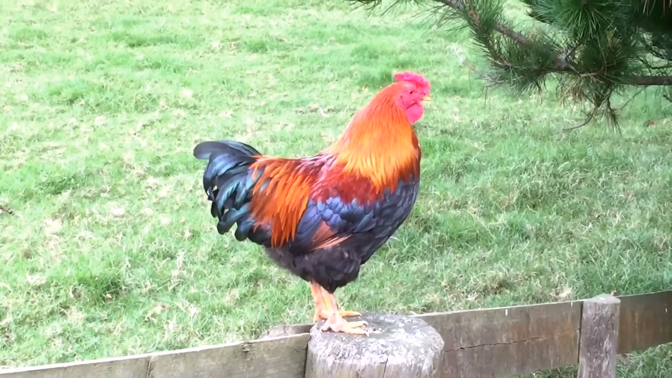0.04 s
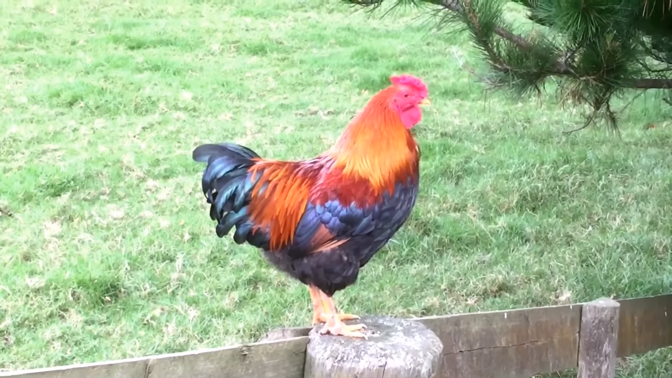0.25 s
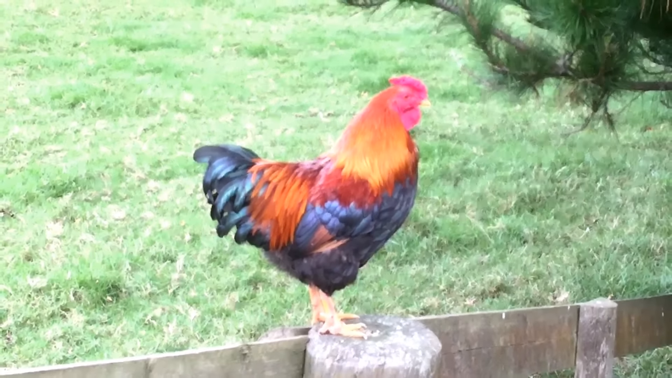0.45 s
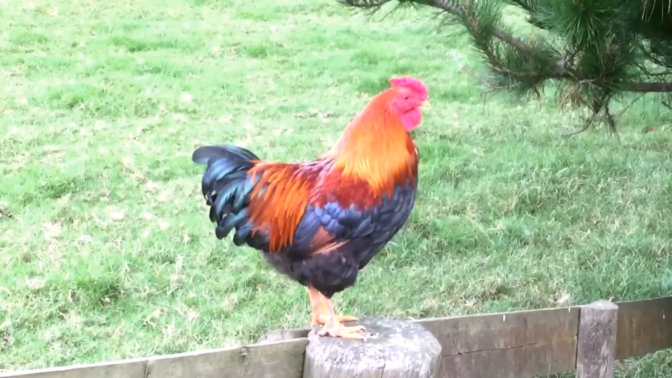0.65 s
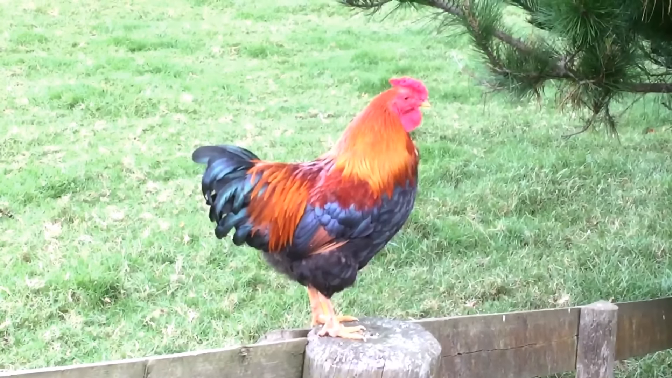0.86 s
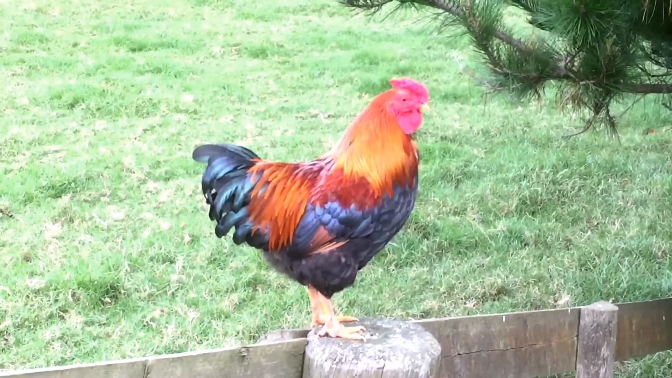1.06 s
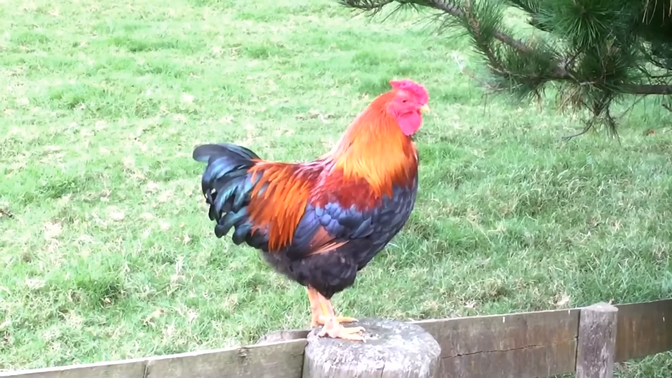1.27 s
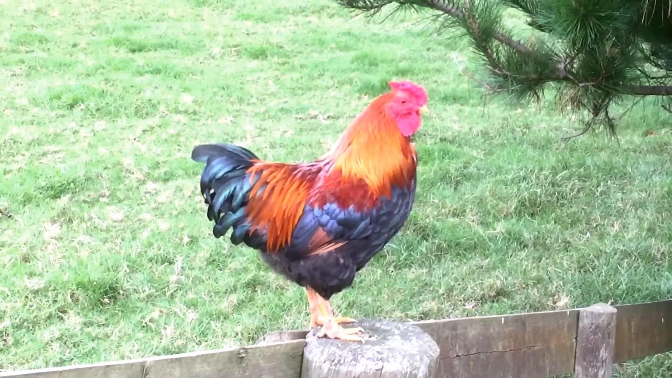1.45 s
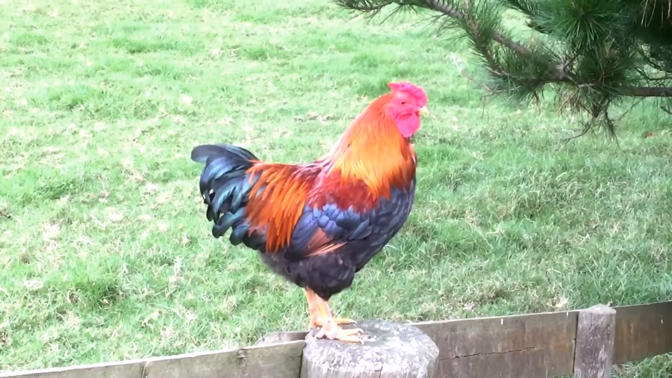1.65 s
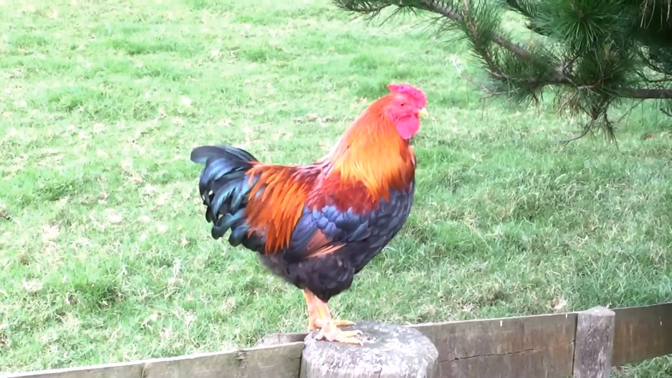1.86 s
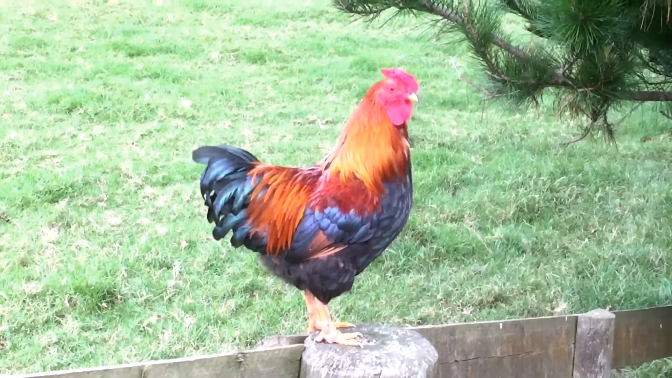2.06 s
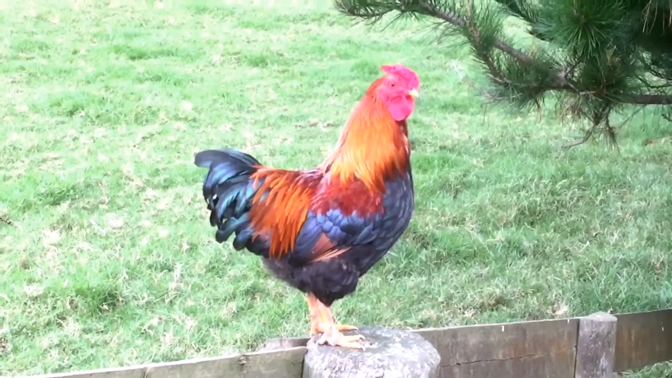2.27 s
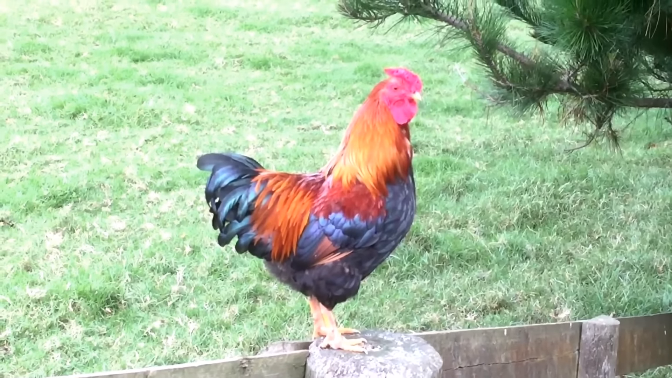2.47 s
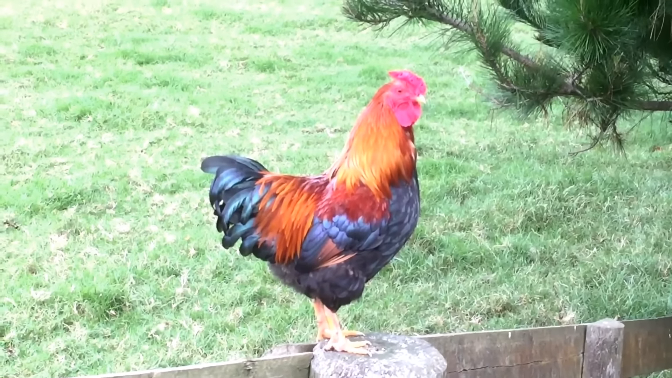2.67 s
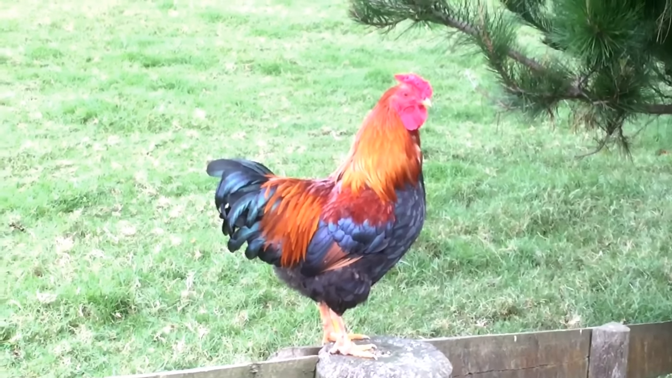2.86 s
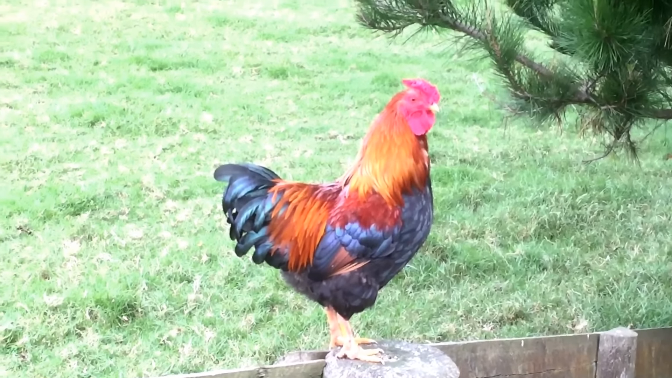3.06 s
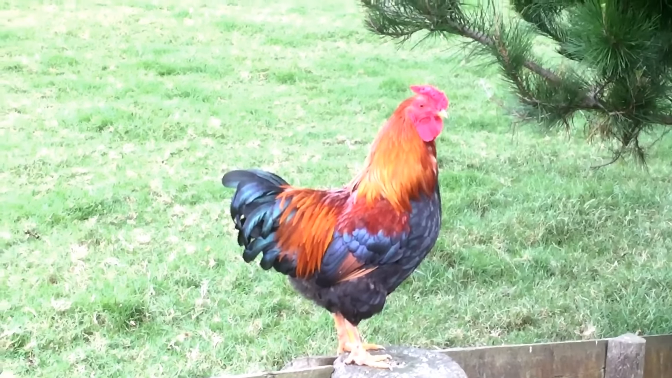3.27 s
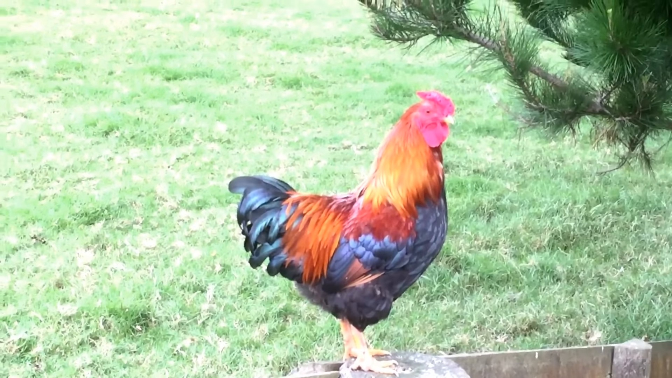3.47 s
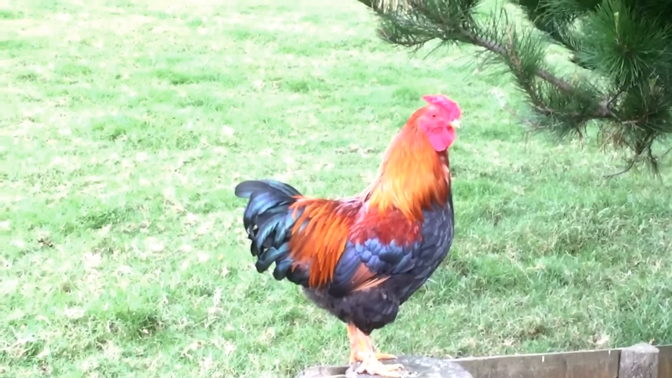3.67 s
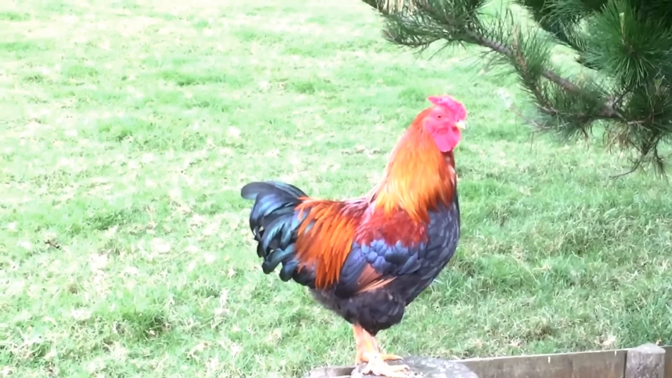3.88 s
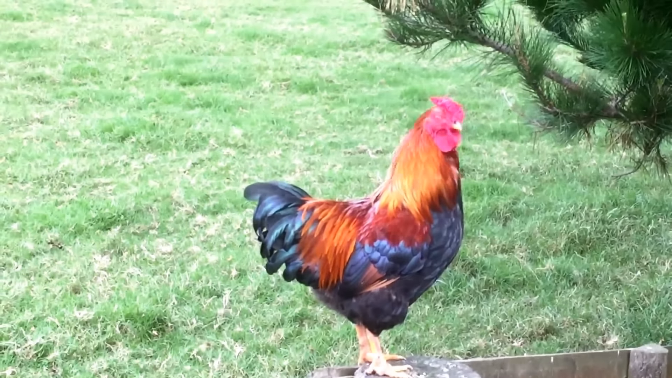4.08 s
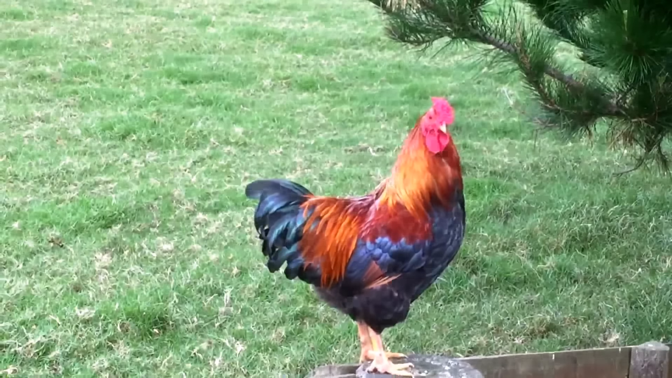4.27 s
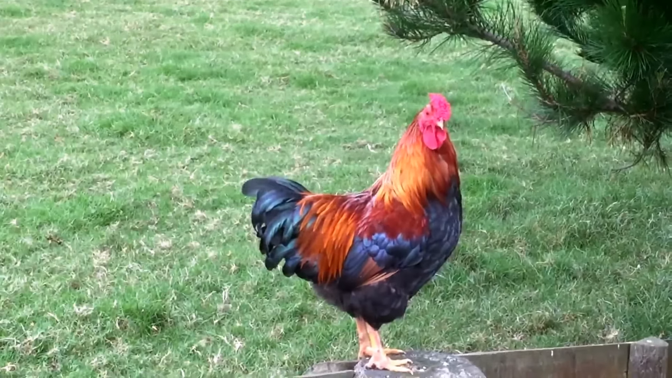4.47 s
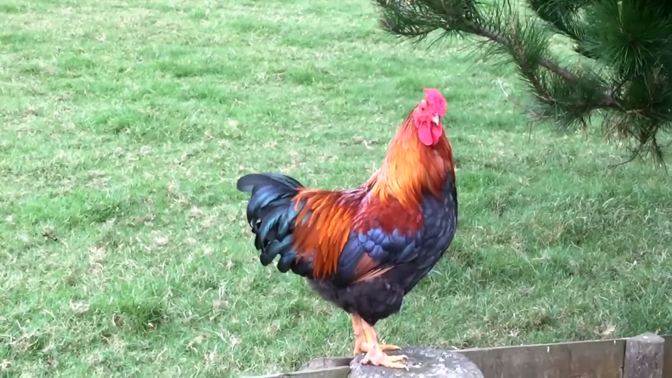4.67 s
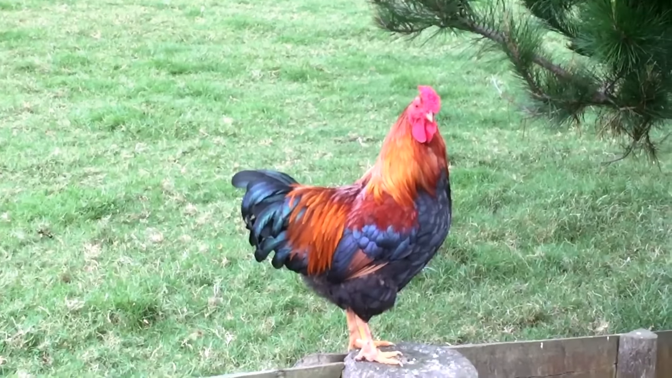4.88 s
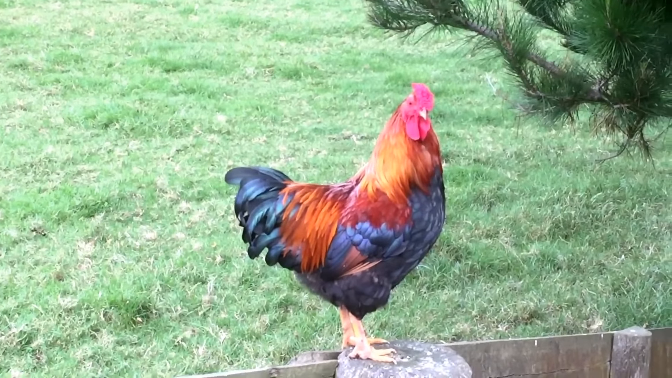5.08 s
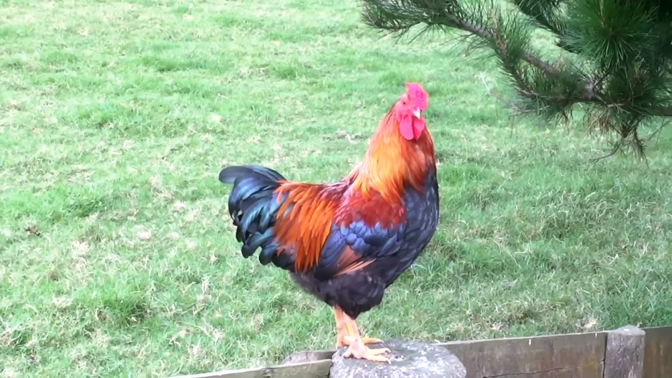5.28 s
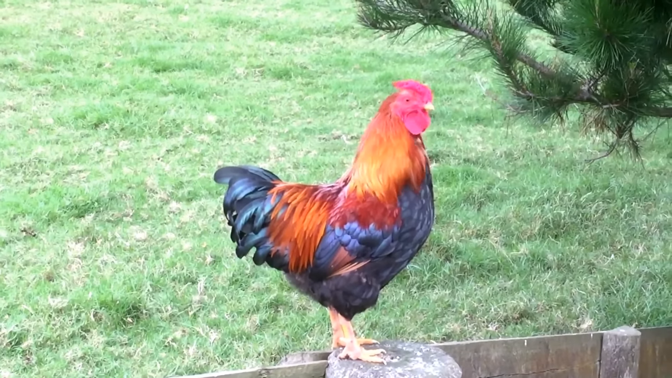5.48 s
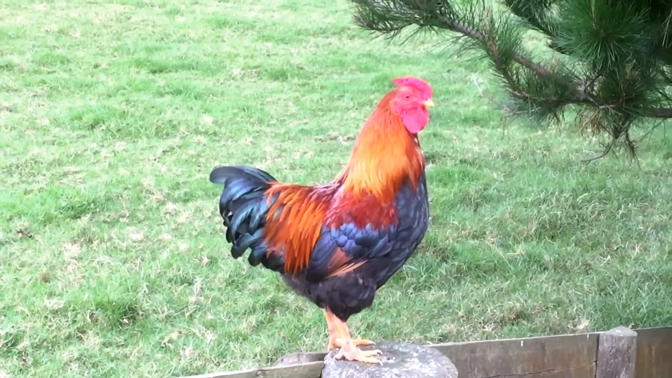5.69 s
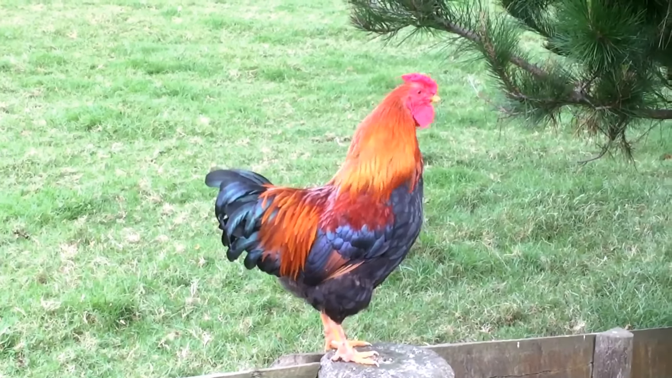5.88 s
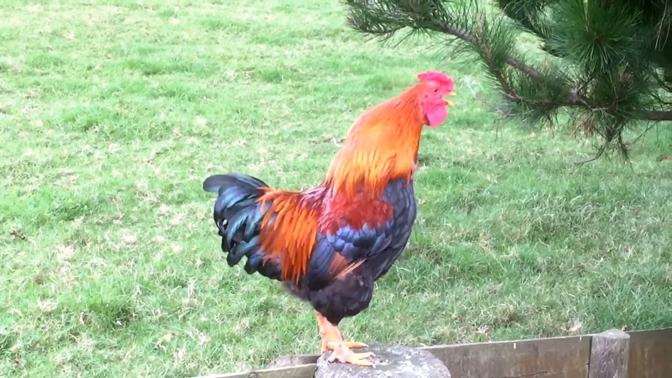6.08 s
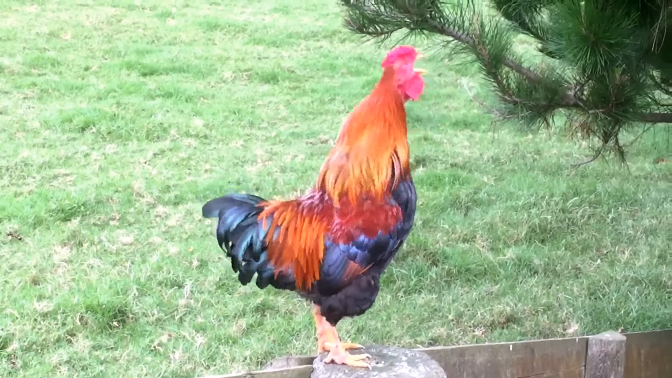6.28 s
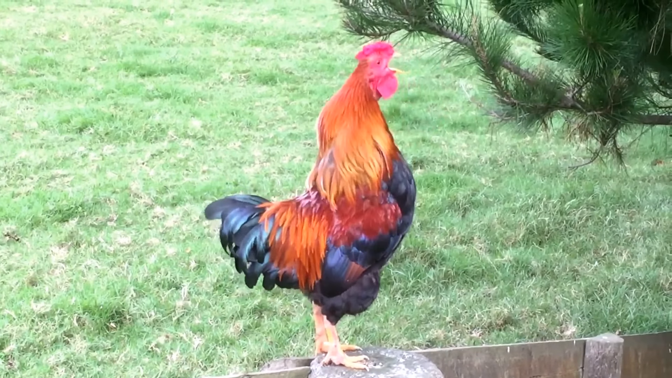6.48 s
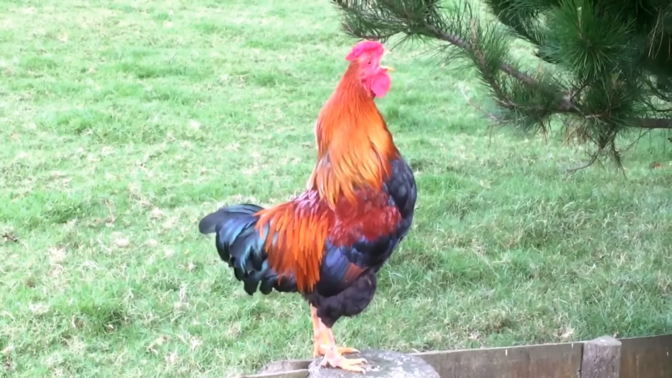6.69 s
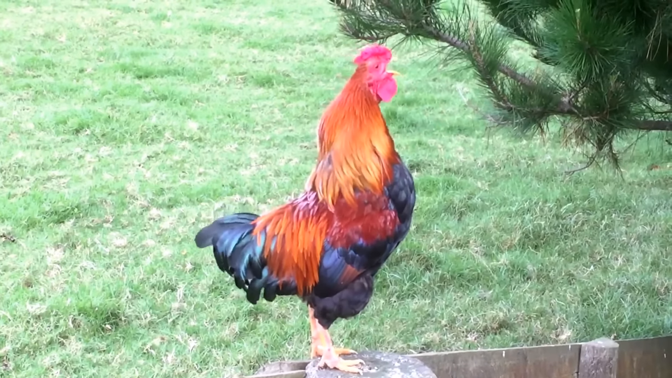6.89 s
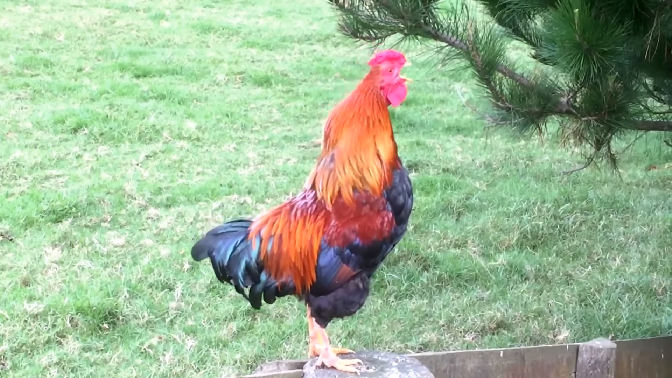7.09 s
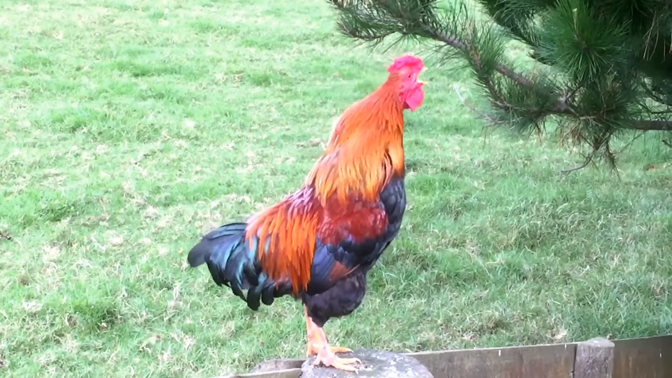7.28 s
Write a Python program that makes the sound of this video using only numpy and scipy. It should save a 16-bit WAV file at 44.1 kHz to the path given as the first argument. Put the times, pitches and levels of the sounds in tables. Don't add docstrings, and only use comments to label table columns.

```python
import sys
import numpy as np
from scipy import signal
from scipy.fft import rfft, irfft
from scipy.io import wavfile
from scipy.ndimage import uniform_filter1d

SR = 44100
rng = np.random.default_rng(int(sys.argv[2]) if len(sys.argv) > 2 else 0)


def undo_db(level):
    steps = np.asarray(level, float) / 20
    return 10 ** steps


def digitize_waveform(pressure):
    field = np.atleast_2d(pressure).T
    bounded = np.clip(field, -1, 1)
    quanta = np.round(bounded * 32767).astype(np.int16)
    wavfile.write(sys.argv[1], SR, quanta)


N = 323694

# (time [s], pitch [Hz], effort [dB], beak opening as second partial [dB], roughness [0-1])
DOODLE = [(6.875, 897.6, -10.5, -6, 0.095), (6.89, 930.5, -12, -3.5, .02), (6.918, 988.6, -17, 11, 0.039),
          (6.94, 925, -10.5, -1.5, .04), (6.96, 960, -13.5, 0, .03), (7.04, 961, -12.5, -0.5, 0.056),
          (7.09, 929, -13.5, -1.5, 0.027), (7.175, 912, -13, -2, 0.025), (7.195, 846, -14.5, -10, .1)]
DIP = [(7.197, 668, -24.5, -0.5, 0.31), (7.222, 637, -25.5, -4.5, 0.28), (7.262, 703, -20, -2.5, 0.11),
       (7.271, 768, -15.5, -9, .26)]


def rms_one(x):
    return x / np.sqrt(np.mean(x ** 2) + 1e-20)


def in_time(rows):
    s, *columns = np.transpose(rows)
    return [np.interp(np.arange(N) / SR, s, c) for c in columns]


def at_hz(points, hz):
    point_hz, point_db = np.array(points).T
    return np.interp(np.log(hz), np.log(point_hz), point_db)


def drift(rate, size=N):
    pole = np.exp(-16 * np.pi * rate / SR)
    settle = 9000
    noise = rng.standard_normal(size // 8 + settle + 2)
    slow = signal.lfilter([1], [1, -2 * pole, pole * pole], noise)[settle:]
    return np.interp(np.arange(size) / 8, np.arange(len(slow)), rms_one(slow - slow.mean()))


def through(x, spectrum):
    log_gain = at_hz(spectrum, np.arange(4097) * SR / 8192 + 1) * np.log(10) / 20
    cepstrum = irfft(log_gain)
    cepstrum[1:4096] *= 2
    response = irfft(np.exp(rfft(cepstrum[:4097], 8192)))
    return signal.fftconvolve(x, response)[:len(x)]


def band(x, low_hz, high_hz, order=2):
    return signal.sosfilt(signal.butter(order, [low_hz, high_hz], "band", fs=SR, output="sos"), x)


def add(out, s, sound):
    at = round(s * SR)
    out[at:at + len(sound)] += sound[:N - at]


def road(patchy_db):
    # (frequency [Hz], level [dB per Hz])
    road_colour = [(25, -51), (50, -3), (140, -9.5), (224, 0.5), (300, -8), (450, -15.5), (710, -16),
                   (1460, -11), (2250, -19.5), (2650, -28.5), (3700, -36), (4900, -47), (9000, -50),
                   (15000, -61)]
    # (nearest [s], approach [s], retreat [s], level over the hum [dB])
    passes = [
        (2.9, 1.59, 0.3, 7),
        (4.3, 1.25, 0.46, 8.5),
        (4.8, 1.05, 1.8, 6.5),
        (5.5, 1.7, 0.88, 3),
        (6.099, 0.63, 2.5, 1),
        (3.9, 1.4, 0.7, 7),
        (5.7, 0.54, 1.7, 5),
    ]
    # (centre [Hz], width [octaves])
    pass_colours = [(1700, 0.8), (214, 0.45), (470, 0.37), (70.5, 0.66), (1300, 1.35), (3100, 0.35),
                    (2970, 0.23)]
    patchy_top_hz, patchy_top_boost = 3040, 0.97
    t = np.arange(N) / SR
    near = []
    for s, approach, retreat, db in passes:
        spread = np.where(t < s, approach, retreat)
        near.append(np.exp(-.5 * ((t - s) / spread) ** 2) * undo_db(2 * db))
    white, out = rng.standard_normal((2, N)), 0
    edges = 22 * 2 ** np.arange(0, 9.9, 1 / 3)
    for k, (low, high) in enumerate(zip(edges, edges[1:])):
        hz = np.sqrt(low * high)
        shares = [np.exp(-.5 * (np.log2(hz / centre_hz) / octaves) ** 2)
                  for centre_hz, octaves in pass_colours]
        power = 1 + np.dot(shares, near)
        mean_power = np.exp(np.log(power).mean())
        far = np.clip(1 - .5 * np.log2(max(hz / 3200, 1)), 0, 1)
        hedge = patchy_top_boost * np.exp(-.5 * (np.log2(hz / patchy_top_hz) / 1.2) ** 2)
        flicker = undo_db(patchy_db * (far + hedge) * drift(3.2))
        out = out + (power / mean_power) ** (far / 2) * flicker * band(white[k % 2], low, high)
    return undo_db(-41) * rms_one(through(out, road_colour))


def car():
    # (time [s], upper edge [Hz], level [dB])
    rising_edge = [(3.0, 865, -49.5), (4.0, 1110, -50.5), (4.4, 1170, -44.5), (4.8, 1300, -45),
                   (5.1, 1700, -42), (5.4, 1899, -44), (5.9, 2090, -46), (6.2, 2250, -56)]
    edge_hz, db = in_time(rising_edge)
    white, roar = rng.standard_normal((3, N)), 0
    edges = 540 * 2 ** np.arange(0, 2.4, 1 / 6)
    for k, (low, high) in enumerate(zip(edges, edges[1:])):
        tilt = (high / edge_hz) ** .4
        edge_loss = 1 + (np.sqrt(low * high) / edge_hz) ** 24
        roar = roar + band(white[k % 2], low, high, order=3) * tilt / edge_loss * undo_db(1.3 * drift(4))
    spray = (edge_hz / 1900) ** 0.65 * rms_one(band(white[2], 4600, 6500))
    return undo_db(db) * rms_one(roar) + undo_db(db - 27.0) * spray


def engines():
    # (time [s], level [dB])
    idling = [(0, -49.5), (.7, -44), (1.3, -56), (2.0, -54), (2.6, -45), (3.2, -46)]
    # (time [s], firing rate [Hz], load [dB])
    pulling = [(4.4, 60.6, -48.5), (4.98, 66.1, -52), (5.2, 70.6, -48.5), (5.35, 73.3, -55.5),
               (5.6, 74.9, -48.5), (5.9, 74.3, -51.5), (6.1, 76.46, -51.5), (7.3, 77, -56)]
    idle_hz, beat_period_s, beat_start_s, beat_share = 59.4, .62, 0.092, 1
    db, = in_time(idling)
    t = np.arange(N) / SR
    beat = (1 + beat_share * np.cos(2 * np.pi * (t - beat_start_s) / beat_period_s)) / 2
    idle_phase = 2 * np.pi * np.cumsum(idle_hz * (1 + 0.013 * drift(2.44))) / SR
    idle = undo_db(db) * beat * np.sin(idle_phase) * np.clip((3.6 - t) / 0.3, 0, 1)
    hz, load_db = in_time(pulling)
    phase = 2 * np.pi * np.cumsum(hz * (1 + 0.02 * drift(5.1))) / SR
    boom_db = -51 + 1.8 * (load_db + 49)
    orders = undo_db(boom_db + 6) * np.sin(phase)
    orders += undo_db(load_db + 6.5) * (np.sin(2 * phase) + 0.59 * np.sin(3 * phase))
    return idle + orders * np.clip((t - 4.2) / 0.49, 0, 1)


def insect(hz=8800):
    # (start [s], end [s], chirp level [dB])
    ticking = [
        (.6, 2.08, -74.5),
        (2.6, 4.05, -76),
        (4.45, 5.797, -76),
    ]
    start_s, period_s = .0995, .11767
    t = np.arange(N) / SR
    beat = ((t - start_s) / period_s + .5) % 1 - .5
    strokes = 1 + 0.51 * np.sin(2 * np.pi * 230 * t)
    chirp = np.exp(-.5 * (beat * period_s / 0.0039) ** 2) * strokes
    tone = band(rng.standard_normal(N), hz - 170, hz + 170)
    bouts = sum(undo_db(db) * np.clip(np.minimum(t - start, end - t) / .15, 0, 1)
                for start, end, db in ticking)
    return bouts * chirp * rms_one(tone)


def small_bird():
    # (start [s], level [dB], number of notes)
    phrases = [
        (.607, -61, 21),
        (3.685, -60, 9),
        (4.04, -63, 4),
        (4.19, -58, 17),
        (5.246, -60, 10),
    ]
    period_s, trill_hz, gain_db, uneven_db = 0.043, 3590, -4.5, 2.5
    out, t = np.zeros(N), np.arange(round(0.019 * SR)) / SR
    for start, db, count in phrases:
        for k, (late, loud, high) in enumerate(rng.standard_normal((count, 3))):
            note_hz = trill_hz * (1 + .012 * high)
            chirp = np.hanning(len(t)) * np.sin(2 * np.pi * note_hz * (1.085 * t - 3.6 * t ** 2))
            at_s = start - .006 + period_s * k + 0.0049 * late
            add(out, at_s, undo_db(db + gain_db + uneven_db * loud) * chirp)
    t = np.arange(SR // 5) / SR
    trees = rng.standard_normal(len(t)) * undo_db(-60 * t / .25)
    return out + undo_db(-36) * signal.fftconvolve(out, trees)[:N]


def rustles():
    # (time [s], level [dB], centre [Hz], width [octaves], length [s])
    bursts = [(0.24, -66, 7000, 1.2, 0.0035), (0.491, -53, 2960, 0.14, 0.051),
              (0.495, -58, 4140, 0.17, 0.037), (0.499, -65, 5600, .12, 0.055), (.602, -74, 5600, .12, .02),
              (3.016, -69, 9800, .5, .03), (3.102, -59, 7000, 0.93, .035), (3.302, -62, 6450, 0.52, 0.011),
              (3.39, -66, 8000, .7, .06), (3.407, -54, 7750, .8, .008), (3.625, -48.5, 6660, 1, 0.0058),
              (3.631, -63, 5000, 1.2, 0.095), (4.117, -68, 8000, .9, .02), (5.135, -66, 6000, 0.83, 0.0051),
              (5.508, -67, 5980, 0.83, .006), (5.966, -65, 6300, 0.18, 0.035), (5.989, -64, 5590, .2, .03),
              (6.136, -55.5, 4960, 0.37, 0.025), (6.155, -58, 4730, 0.32, 0.019)]
    size = 9000
    noise = rng.standard_normal((len(bursts), size)) * undo_db(3 * rng.standard_normal(size))
    out, t = np.zeros(N), np.arange(size) / SR
    for (s, db, hz, octaves, length), grain in zip(bursts, noise):
        half = 2 ** (octaves / 2)
        burst = rms_one(band(grain, hz / half, min(hz * half, 19000)))
        envelope = np.minimum(t / (0.1 * length), 1) * np.exp(-t / length)
        add(out, s, undo_db(db - 0.5) * burst * envelope)
    return out


def voice_controls(syllables, t):
    # (time [s], length [s], head pitch [Hz], effort [dB], roughness [0-1])
    cracks = [
        (6.343, .006, 940, -8, 0.72),
        (6.364, 0.01, 919, -9.5, 0.71),
        (6.39, 0.0046, 950, -8.5, 0.7),
        (6.411, .007, 991, -9, 0.76),
        (6.919, .014, 1100, -14, 0.05),
        (6.983, .008, 1091, -10.5, 0.33),
        (6.992, .005, 1072, -21, 0.7),
        (6.997, .018, 1090, -14.5, 0.21),
        (7.039, 0.0056, 1061, -13.5, .58),
    ]
    controls = np.zeros((4, len(t)))
    for k, rows in enumerate(syllables):
        s, *columns = np.transpose(rows)
        curves = [np.interp(t, s, c) for c in columns]
        controls = np.where((t >= s[0]) | (k == 0), curves, controls)
    hz, effort_db, second_db, rough = controls
    quiver = np.cos(2 * np.pi * 36.5 * (t - 6.95)) * (t > DOODLE[0][0]) * (t < DIP[0][0])
    quiver *= np.exp(-np.clip(t - cracks[-1][0], 0, None) / 0.21)
    hz = hz * (1 + 0.013 * quiver)
    second_db = second_db + 2.5 * quiver
    for s, length, head_hz, head_db, head_rough in cracks:
        inside = (t > s) & (t < s + length)
        settle = (t >= s + length) * np.exp(-np.abs(t - s - length) / 0.0043)
        hz = np.where(inside, head_hz, hz)
        rough = np.where(inside, head_rough, rough + 0.66 * settle)
        effort_db = np.where(inside, head_db, effort_db)
        second_db = np.where(inside, -1, second_db + 7 * settle)
    return hz, effort_db, second_db, rough


def note(syllables, throat, cavities, breath_db, rasp_db, jitter, blur):
    # (start [s], end [s], level [dB])
    half_lines = [
        (6.304, 6.347, -29),
        (6.343, 6.418, -14),
        (6.686, 6.77, -36),
        (7.28, 7.311, -19.5),
    ]
    odd_partials_db = -1.5
    onset = syllables[0][0][0]
    t = onset - .005 + np.arange(round(.75 * SR)) / SR
    hz, effort_db, second_db, rough = voice_controls(syllables, t)
    pitch = uniform_filter1d(hz, size=45)
    rough = uniform_filter1d(np.clip(rough, 0, 1), size=130)
    effort = uniform_filter1d(undo_db(effort_db) * (t > onset), size=150)
    second = uniform_filter1d(undo_db(second_db), size=260)
    wobble = jitter * rough * drift(220, size=len(t)) + 0.0036 * drift(40, size=len(t))
    pitch = pitch * (1 + wobble)
    phase = 2 * np.pi * np.cumsum(pitch) / SR
    pulses = np.cos(phase) + second * np.cos(2 * phase)
    for k in range(3, 25):
        smear = blur * (k - 3) * drift(160, size=len(t))
        shimmer = undo_db(min(k - 2, 4.5) * drift(26.7, size=len(t)))
        audible = k * pitch < 17000
        pulses += np.cos(k * phase + smear) * shimmer * audible * undo_db(odd_partials_db * (k % 2))
    for start, end, db in half_lines:
        gate = uniform_filter1d(1. * (t > start) * (t < end), size=300)
        pulses *= 1 + 2 * undo_db(db) * np.cos(phase / 2) * gate
    hiss = rng.standard_normal(len(t)) * (1 + 0.44 * np.cos(phase))
    voice = pulses * (1 - .5 * rough) + undo_db(breath_db) * (0.012 + rough) * hiss
    voice += undo_db(rasp_db) * (0.11 + rough) * np.sqrt(effort / 0.064) * band(hiss, 3140, 22000)
    voice = through(effort * voice, throat)
    for centre_hz, width_hz, db in cavities * 2:
        resonance = signal.lfilter(*signal.iirpeak(centre_hz, centre_hz / width_hz, SR), voice)
        voice = voice + (undo_db(db) - 1) * resonance
    out = np.zeros(N)
    add(out, t[0], voice)
    return out


def rooster():
    # (frequency [Hz], level [dB])
    throat_bent = [(400, -51), (650, -4.5), (1200, 1), (1350, -8), (1800, -3), (2250, -11.5), (2600, -33.5),
                   (3550, -23.5), (4150, -55), (5500, -22), (6100, -23.5), (7900, -37), (11900, -45.5),
                   (15000, -52)]
    throat_stretched = [(600, -15), (760, 2), (860, 4), (1200, -1), (1350, 6.5), (2150, 0.5), (3050, -24.5),
                        (3650, -3.5), (4050, -20.5), (4970, -22.5), (6600, -26), (7650, -25.5),
                        (8900, -29.5), (15000, -37.5)]
    # (centre [Hz], width [Hz], level [dB])
    cavities_bent = [(4050, 450, -14), (9000, 500, -7), (10300, 400, -5), (13400, 600, -7)]
    cavities_stretched = [(3100, 400, -16), (4980, 850, -22), (12700, 1800, -24), (7550, 450, 4),
                          (14500, 2500, -4)]
    # (time [s], pitch [Hz], effort [dB], beak opening as second partial [dB], roughness [0-1])
    cock_start = [(6.264, 625.5, -24, 0, 0.96), (6.27, 708, -11.5, 1.4, 0.52), (6.284, 712, -11.5, 1, .15)]
    cock = [(6.286, 784, -3, -10, .02), (6.293, 833, -15, 14.5, .1), (6.308, 839, -11.5, 0, 0.03),
            (6.335, 866, -15, 11.5, 0), (6.35, 889, -12, -4, 0.43), (6.378, 886, -12, 3, 0.22),
            (6.405, 887, -11.5, -0.5, 0.04), (6.435, 893, -9, 1, 0.06), (6.47, 856, -9.5, -2, 0.21)]
    cock_end = [(6.476, 765, -15.5, 10, 0.99), (6.5, 838, -33.5, 6, 0.92), (6.506, 840, -73, 4, 0)]
    a_start = [(6.671, 607.3, -19.5, 2.5, 0.8), (6.678, 708, -19.5, 2, 0.61),
               (6.685, 831, -11.5, -7.5, .13), (6.692, 939, -10.5, -2, 0.098), (6.7, 938, -13, 6, 0.16)]
    a_syllable = [(6.701, 1074, -11, -12, 0.23), (6.718, 1100, -9.5, 3.5, 0.064),
                  (6.735, 1118, -9.5, 7.5, 0.04), (6.768, 1100, -9, 2, .05), (6.774, 1066, -11.5, -7, 0.17),
                  (6.787, 1047, -15.5, 3.5, 0.19), (6.792, 965, -14.5, 3, .6), (6.797, 890, -8.5, -6, 0.07),
                  (6.807, 825, -15, -11, 0.21)]
    creak = [(6.809, 647.7, -21, -5, 0.71), (6.828, 619.2, -23, -3.5, 0.73), (6.842, 686.4, -27, 7, 1),
             (6.848, 758.7, -22, -4, 1), (6.854, 663, -19.5, -2.5, 0.58), (6.869, 716, -20.5, -1, 0.33),
             (6.874, 821.5, -19, -4, 0.78)]
    doo = [(7.273, 857, -15, 1, .18), (7.282, 873, -17.5, -2.5, .05), (7.34, 903, -18.5, 3.5, .035)]
    # (time [s], pitch [Hz], level [dB], length [s])
    cluck = [
        (6.134, 1600, -33, .022),
    ]
    crow = note([cock_start, cock, cock_end], throat_bent, cavities_bent,
                breath_db=0, rasp_db=9, jitter=.05, blur=.11)
    crow += note([a_start, a_syllable, creak, DOODLE, DIP, doo], throat_stretched, cavities_stretched,
                 breath_db=3.5, rasp_db=7, jitter=0.051, blur=0.031)
    crow *= undo_db(3.5)
    for s, hz, db, length in cluck:
        t = np.arange(round(length * SR)) / SR
        squeak = np.sin(2 * np.pi * hz * t) + 0.085 * np.sin(4 * np.pi * hz * t)
        add(crow, s, undo_db(db) * np.sin(np.pi * t / length) * squeak)
    t = np.arange(SR // 2) / SR
    scatter = rng.standard_normal(len(t)) * (t > .008)
    echo = band(scatter, 1370, 4000) * undo_db(-60 * t / .5)
    echo += 1.6 * band(scatter, 4200, 8800) * undo_db(-60 * t / 0.25)
    echo += 0.42 * band(scatter, 480, 1640) * undo_db(-60 * t / 0.4)
    return crow + undo_db(-46) * signal.fftconvolve(crow, echo)[:N]


def scene():
    far = road(patchy_db=1.09) + car() + engines() + insect() + small_bird() + rustles()
    return (far + rooster())[None]


def band_limit(x):
    return signal.sosfilt(signal.butter(12, 15910, fs=SR, output="sos"), x)


def record(dry):
    t = np.arange(N) / SR
    level_db = 10 * np.log10(uniform_filter1d(dry[0] ** 2, size=900) + 1e-12)
    held_db = np.maximum.accumulate(level_db + 4 * t) - 4 * t
    attack = np.exp(-1 / (.012 * SR))
    cut_db = signal.lfilter([1 - attack], [1, -attack], 0.32 * np.clip(held_db + 22.5, 0, None))
    headroom = 1.17
    rounded = headroom * np.tanh(dry * undo_db(-cut_db) / headroom)
    top_cut = signal.ellip(12, .5, 80, 15300, fs=SR, output="sos")
    return band_limit(signal.sosfilt(top_cut, rounded))


dry = scene()
out = record(dry)
digitize_waveform(out)
```